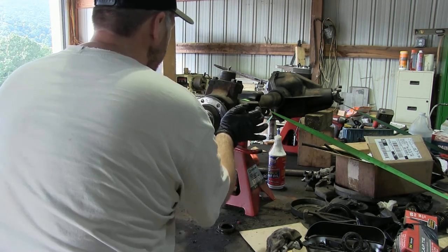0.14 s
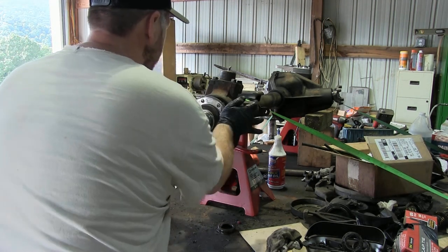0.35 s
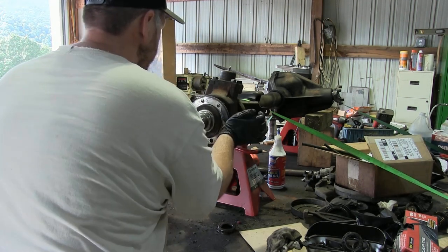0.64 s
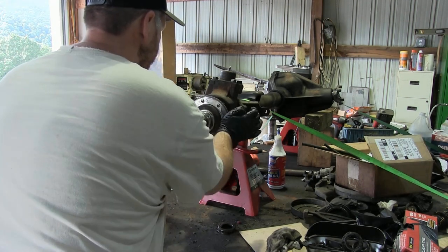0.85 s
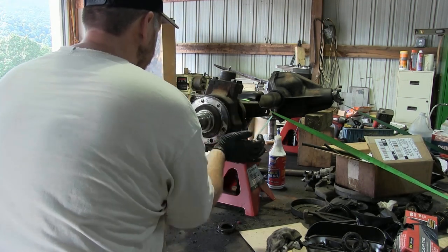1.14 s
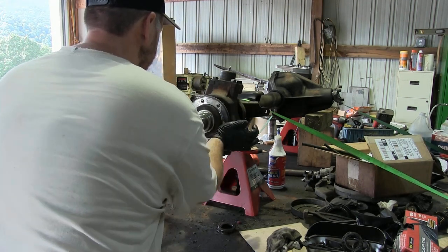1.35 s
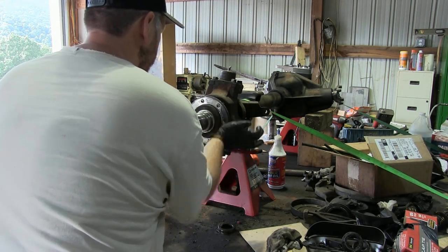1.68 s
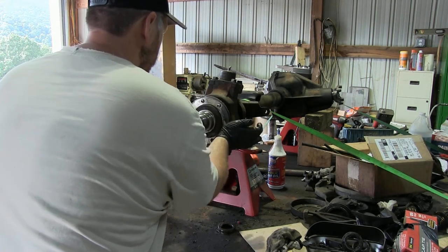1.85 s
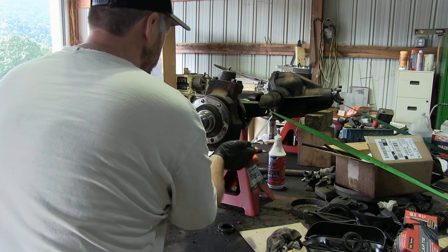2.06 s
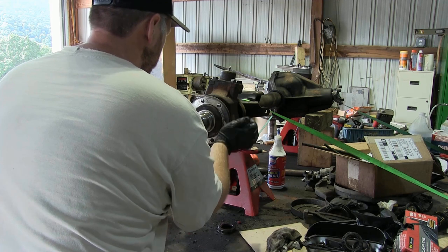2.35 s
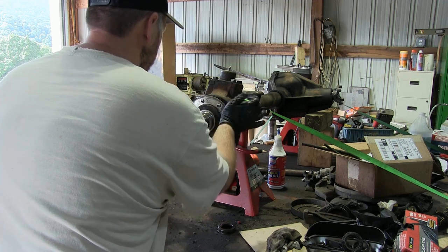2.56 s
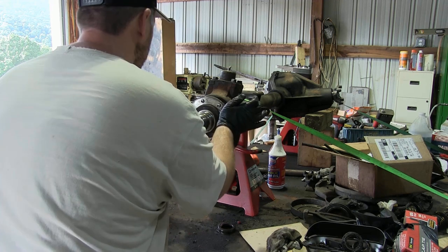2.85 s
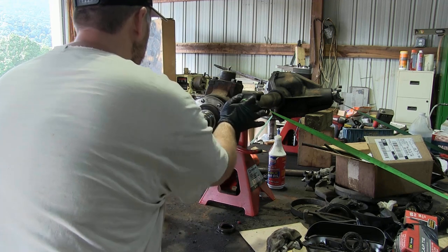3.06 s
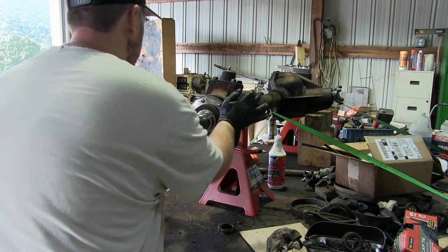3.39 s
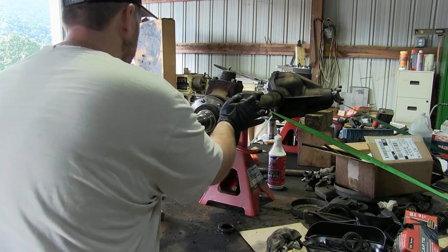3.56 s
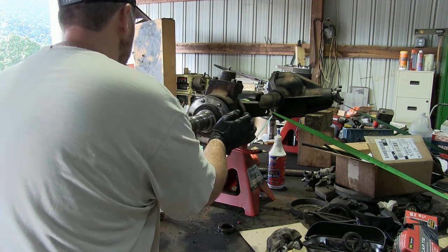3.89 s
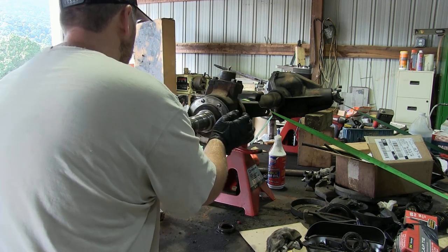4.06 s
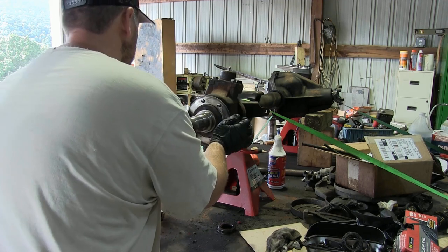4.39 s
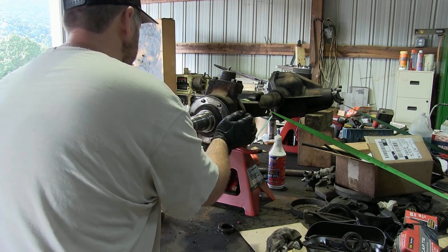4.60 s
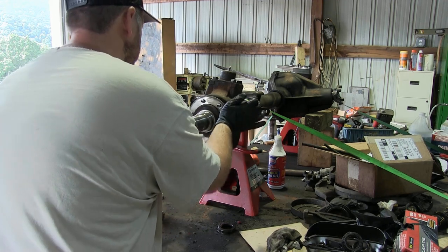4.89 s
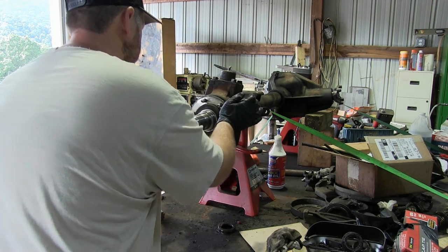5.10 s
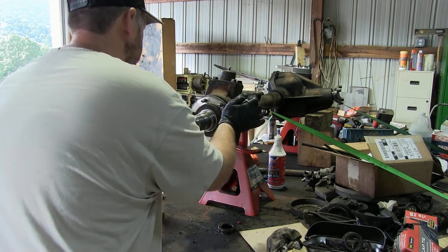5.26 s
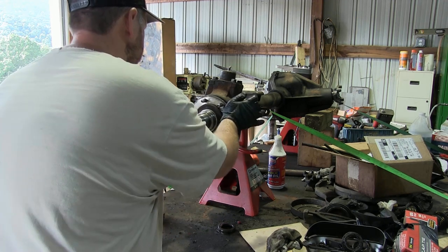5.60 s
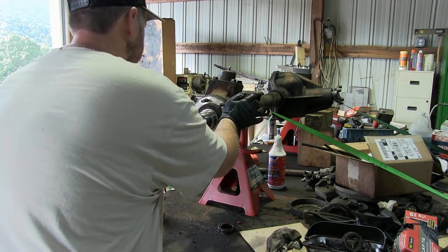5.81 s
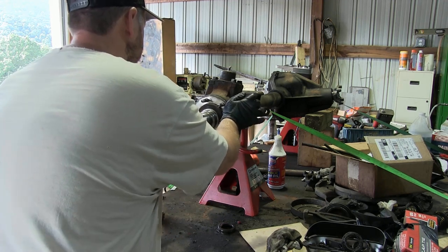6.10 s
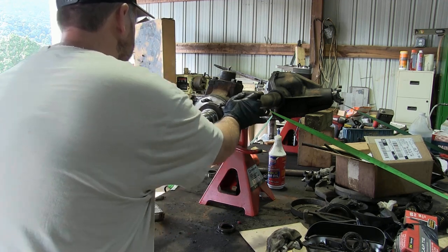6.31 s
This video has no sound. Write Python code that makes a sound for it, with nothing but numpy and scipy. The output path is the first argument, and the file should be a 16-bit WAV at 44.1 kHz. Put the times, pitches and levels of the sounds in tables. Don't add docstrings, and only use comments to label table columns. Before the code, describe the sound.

Uneven bursts of hard metal-on-metal clunks, with bounces, bright ticks and low floor thumps, over quiet insect hiss, distant rumble and faint electrical hum.

```python
import sys
import numpy as np
from scipy import signal
from scipy.fft import rfft, irfft
from scipy.io import wavfile
from scipy.ndimage import uniform_filter1d

SR = 44100
rng = np.random.default_rng(int(sys.argv[2]) if len(sys.argv) > 2 else 0)


def persist_wave(psi):
    counts = np.round(np.clip(psi, -1, 1) * 32767).astype(np.int16)
    wavfile.write(sys.argv[1], SR, np.atleast_2d(counts).T)


def invert_db(x):
    u = np.asarray(x, float) / 20
    return 10 ** u


N = 284004


def at_hz(points, hz):
    table_hz, value = np.array(points).T
    return np.interp(np.log(hz), np.log(table_hz), value)


def drift(rate_hz, size=N):
    r = np.exp(-80 * np.pi * rate_hz / SR)
    white = rng.standard_normal(size // 40 + 2002)
    slow = signal.lfilter([1], [1, -2 * r, r * r], white)[2000:]
    return np.interp(np.arange(size) / 40, np.arange(len(slow)), slow / slow.std())


def band(x, low_hz, high_hz):
    edges_hz = [low_hz, min(high_hz, .45 * SR)]
    return signal.sosfilt(signal.butter(2, edges_hz, "band", fs=SR, output="sos"), x)


def noise_bank(size, likeness, gain):
    out = 0
    edges = 28 * 2 ** np.arange(0, 9.4, 1 / 3)
    white = rng.standard_normal((2, 2, size + 4000))
    for k, (low, high) in enumerate(zip(edges, edges[1:])):
        third_octave = signal.butter(2, [low, high], "band", fs=SR, output="sos")
        mid, side = signal.sosfilt(third_octave, white[k % 2])[:, 4000:]
        hz = np.sqrt(low * high)
        alike = np.clip(at_hz(likeness, hz), -1, 1)
        stereo = np.sqrt(1 + alike) * mid + np.sqrt(1 - alike) * side * [[1], [-1]]
        out = out + gain(hz) * stereo
    return out


def ring(clicks, hz, t60):
    r, w = invert_db(-60 / (t60 * SR)), 2 * np.pi * hz / SR
    return signal.lfilter([0, np.sin(w)], [1, -2 * r * np.cos(w), r * r], clicks + 1e-18)


def swell(x, hz, rise_s):
    r = np.exp(-1 / (rise_s * SR))
    numerator = (1 - r * r) / 2 * np.array([1, 0, -1])
    return signal.lfilter(numerator, [1, -2 * r * np.cos(2 * np.pi * hz / SR), r * r], x)


# (frequency [Hz], rms level [dB])
HUM_HARMONICS = [(120, -63.5), (240, -63.5), (360, -63), (480, -56)]


def hum():
    t = np.arange(N) / SR
    out = np.zeros(N)
    for hz, db in HUM_HARMONICS:
        level = np.sqrt(2) * invert_db(db + 1.4 * drift(9.3))
        out += level * np.sin(2 * np.pi * hz * t + 2.08 * drift(2.76))
    return out


# (frequency [Hz], density [dB per Hz])
RUMBLE_SPECTRUM = [(18, -50), (30, -16.5), (239, -13.5), (287, -8), (355, -22.5), (415, -10.5),
                   (473, -10.5), (649, -15.5)]
# (frequency [Hz], density [dB per Hz])
INSECT_SPECTRUM = [(1000, -7), (1900, -11), (2850, 0), (6200, -1.5), (8300, -18), (9500, -13),
                   (10800, -23.5), (16000, -29)]
# (frequency [Hz], left-right likeness [-1 to 1])
OUTSIDE_LIKENESS = [(60, 1), (240, 0.083), (950, 0.27), (3770, 0.48), (15000, 0.49)]
# (frequency [Hz], left over right [dB])
OUTSIDE_BALANCE = [(60, 1), (240, 4), (950, 0), (3770, 2), (15000, 0.5)]
# (time [s], level [dB])
OUTSIDE_SWELL = [(0, -39.5), (1, -40), (1.8, -39), (2.3, -41.5), (3, -40), (3.999, -40.5), (4.999, -39),
                 (5.5, -38), (6.44, -38)]


def outside(insects_db=-10, patchy_db=1.3):
    together = drift(0.82)
    spectrum = RUMBLE_SPECTRUM + [(hz, db + insects_db) for hz, db in INSECT_SPECTRUM]

    def gain(hz):
        balance = invert_db(at_hz(OUTSIDE_BALANCE, hz) / 2 * np.array([[1], [-1]]))
        patches = .5 * together + drift(9.8)
        return balance * invert_db(at_hz(spectrum, hz) + patchy_db * patches)

    air = noise_bank(N, OUTSIDE_LIKENESS, gain)
    s, level_db = np.transpose(OUTSIDE_SWELL)
    return invert_db(np.interp(np.arange(N) / SR, s, level_db)) * air / air.std()


# (frequency [Hz], t60 [s])
SHED_T60 = [(60, 0.94), (200, 0.81), (600, 0.75), (1500, 0.56), (4000, 0.55), (10000, 0.27)]
# (frequency [Hz], left-right likeness [-1 to 1])
SHED_LIKENESS = [(60, 1), (240, 0.96), (950, 0.74), (3770, 0.67), (15000, 0.77)]


def shed(dry, even_over_hz=24):
    t = np.arange(SR) / SR

    def gain(hz):
        t60 = at_hz(SHED_T60, hz)
        return invert_db(-60 * t / t60) / np.sqrt(t60)

    both = rfft(noise_bank(SR, SHED_LIKENESS, gain), 2 * SR)
    power = np.abs(both.sum(axis=0)) ** 2
    colour = uniform_filter1d(power, size=2 * even_over_hz) + 1e-4 * power.mean()
    echo = irfft(both / np.sqrt(colour))[:, :SR]
    echo = echo * (1 - np.exp(-t / 0.00064)) / np.sqrt(np.sum(echo ** 2) / 2)
    return signal.fftconvolve(dry[None], echo, axes=1)[:, :N]


# (time [s], level [dB])
THUMPS = [(0.066, -52), (0.458, -38), (0.93, -49.5), (1.046, -55), (1.358, -35), (1.447, -47), (1.819, -31),
          (2.718, -51.5), (3.1, -51), (3.513, -36), (3.619, -52), (4.167, -39), (4.27, -55), (4.519, -41),
          (5.069, -37.5), (5.52, -45), (5.789, -42.5), (6.057, -37.5), (6.2, -45)]


def slab(hz=75.7, t60=0.48):
    clicks = np.zeros(N)
    s, db = np.transpose(THUMPS)
    clicks[[round((time - .01) * SR) for time in s]] = invert_db(db + 7.0)
    return swell(ring(clicks, hz, t60), hz, 0.016)


# (time [s], level [dB], lowest frequency [Hz], highest frequency [Hz])
TICKS = [(0.987, -33, 1000, 3500), (1.019, -28.5, 1000, 3500), (0.439, -24, 700, 3500),
         (0.454, -22, 3000, 11200), (1.342, -15, 795, 5860), (1.3530, 0, 1300, 3800),
         (1.810, -22, 600, 5960), (1.8581, -3.5, 1610, 4470), (2.697, -32, 4000, 15000),
         (3.072, -27, 1000, 6000), (3.501, -25.5, 1500, 15000), (4.144, -31, 790, 2480),
         (4.489, -29, 890, 2200), (5.037, -31, 596, 4000), (5.086, -22, 3500, 5227),
         (5.087, -26, 6300, 7400), (5.1, -7, 1300, 3830), (5.879, -44, 15000, 15800),
         (5.906, -40, 11000, 15800), (5.918, -45, 11000, 15800)]


def ticks():
    out, t = np.zeros(N), np.arange(400) / SR
    for s, db, low_hz, high_hz in TICKS:
        grit = rng.standard_normal(len(t)) * np.exp(-t / 0.00078)
        pulse = band(band(grit, low_hz, high_hz), low_hz, high_hz)
        out[round(s * SR):][:len(t)] += invert_db(db) * pulse / np.abs(pulse).max()
    return out


# (time [s], level [dB])
COLLAR_HITS = [
    (1.86, -34),
    (1.874, -21),
    (1.92, -27),
]
# (frequency [Hz], level [dB], t60 [s])
COLLAR_MODES = [(4010, -6, 0.16), (4020, -5, 0.098), (4230, -10, 0.095)]


def collar():
    s, db = np.transpose(COLLAR_HITS)
    clicks = np.zeros(N)
    clicks[np.round(s * SR).astype(int)] = invert_db(db)
    out = np.zeros(N)
    for hz, mode_db, t60 in COLLAR_MODES:
        out += invert_db(mode_db) * swell(ring(clicks, hz, t60), hz, 0.0015)
    return out


# (time [s], level [dB],
# share of the second family [dB], of the overtones [dB], of the top family [dB])
PINGS = [(0.453, -30.5, 12.5, -14, -32), (0.458, -16.5, -25, -28, -40), (1.354, -13.5, -11, -19, -37),
         (1.3867, -41, -5, 0, -12), (1.821, -11.5, -10, -16, -29.5), (1.8302, -24.5, -6, -4, -19),
         (1.8719, -27, -21, 2, -16), (3.0856, -26, -12, -15, -22), (3.5133, -31.5, -7, -9, -34),
         (4.156, -23, -12, -14, -27), (4.505, -23.5, -11, -19, -28), (5.055, -16, -27, -15.5, -33),
         (5.086, -27, 1, -4, -25), (5.1011, -16, -29, -12, -41), (5.1202, -27, -15, -6, -30),
         (5.154, -26, -22, -8, -26), (5.508, -34, -15, -18, -32), (5.7684, -27, -26, -11, -23),
         (5.7979, -20.5, -24, -21, -30), (5.824, -37, -20, -2, -16), (5.9044, -40, 0, -6, -17)]
# (frequency [Hz], level [dB], t60 [s])
SHAFT_FAMILIES = [
    [(3768, -1.5, 0.066), (3835, 3, 0.063), (3800, -25, 0.14), (3885, -22, 0.097), (3960, -15, 0.19)],
    [(4570, 7, 0.032), (4660, 1, 0.014)],
    [(7620, -16, 0.1), (7750, -8.5, 0.25), (7820, -6, 0.12), (7700, -16, 0.092)],
    [(9950, -0.5, 0.18), (10400, 2, 0.25), (10200, -2, 0.1), (12400, -7, .06)],
]


def shaft():
    s, db, second_db, overtone_db, top_db = np.transpose(PINGS)
    families_db = [db, db + second_db, db + overtone_db, db + top_db]
    at = np.round((s - .001) * SR).astype(int)
    luck = rng.standard_normal((len(s), 4, 8))
    out = np.zeros(N)
    for family, modes in enumerate(SHAFT_FAMILIES):
        for k, (hz, mode_db, t60) in enumerate(modes):
            clicks = np.zeros(N)
            clicks[at] = invert_db(families_db[family] + mode_db + 1.8 * luck[:, family, k])
            out += swell(ring(clicks, hz, t60), hz, 0.0011)
    return out


def strength_db(shove, hz):
    weight_hz, strength_hz, hardness_hz = 150, 550, 1500
    roll_off_db_per_octave = -10.5
    s, db, weight_db, hardness_db = np.transpose(shove)
    low = np.interp(np.log(hz), np.log([weight_hz, strength_hz]), [1, 0])
    high = np.interp(np.log(hz), np.log([strength_hz, hardness_hz]), [0, 1])
    octaves_above = max(np.log2(hz / hardness_hz), 0)
    return db + low * weight_db + high * hardness_db + roll_off_db_per_octave * octaves_above


# (frequency [Hz], level [dB])
CRACK = [(100, -20.5), (300, -7.5), (1000, -4), (3000, 1), (6000, 4.5), (13000, -3)]


def steel(shove, housing, ring_share=0.27, housing_db=-4.0, rattle_db=5.5):
    start = round(shove[0][0] * SR) - 200
    size = min(round((shove[-1][0] + .6) * SR), N) - start
    at = [round((row[0] - .002) * SR) - start for row in shove]
    luck = rng.standard_normal((len(at), 40))
    out = np.zeros(size)
    for k, (hz, db, t60) in enumerate(housing):
        mode_t60 = np.clip(t60, .03, 1.6) * ring_share
        sign = np.sign(luck[:, -1 - k // 4])
        clicks = np.zeros(size)
        clicks[at] = invert_db(strength_db(shove, hz) + db + housing_db + 1.14 * luck[:, k]) * sign
        rattle = invert_db(rattle_db * np.tanh(drift(23.0, size=size)))
        out += rattle * swell(ring(clicks, hz, mode_t60), hz, 0.0011 + 0.51 / hz)
    grit = rng.standard_normal((2, size))
    for k, hz in enumerate(np.geomspace(140, 12800, 14)):
        clicks = np.zeros(size)
        clicks[at] = invert_db(strength_db(shove, hz) + at_hz(CRACK, hz))
        fade = invert_db(-60 / ((0.038 + 50 / hz) * SR))
        load = np.exp(-1 / (0.00053 * SR))
        poles = np.convolve([1, -fade], [1, -load])
        envelope = signal.lfilter([1 - load], poles, clicks + 1e-18)
        out += band(grit[k % 2] * envelope, hz / 1.19, hz * 1.19) * np.sqrt(SR / hz)
    return np.pad(out, (start, N - start - size))


# (time [s], strength [dB],
# weight = extra drive of the lowest modes [dB], hardness = extra drive of the upper modes [dB])
SHOVE_1 = [
    (0.046, -29.5, -1.5, -10),
    (0.451, -7, -8.5, -9.5),
    (0.456, -7, -5.5, -8),
    (0.476, -12, -16, -8),
    (0.497, -15.5, -14, -3),
    (0.641, -26, -25, -13),
    (0.915, -17, -25, -27),
    (0.949, -22.5, -21, -22),
    (0.988, -46, -4, 11),
    (1.019, -41, -15, 2.5),
]
SHOVE_2 = [
    (1.349, -19.5, -4, 2),
    (1.354, -9.5, -4, -4.5),
    (1.36, -25.5, -5, 7),
    (1.389, -24, -4, 7.5),
]
SHOVE_3 = [
    (1.817, -10, 1.5, -8.5),
    (1.8225, -13, -8, 6.5),
    (1.8254, -13, -10, -1.5),
    (1.832, -17, -17, -24),
    (1.859, -11.5, -15, 3.5),
    (1.874, -13.5, -16, -9),
    (1.895, -20, -17, 0),
]
NUDGE = [
    (2.699, -26, -4.5, -10.5),
    (2.714, -41, 1, -3),
    (2.746, -39, 0, -10),
    (2.802, -42, -17, 9.5),
    (2.855, -43, -16, 1),
]
SHOVE_4 = [
    (3.079, -27.5, 11, -8),
    (3.088, -16, -17, -2),
    (3.105, -20.5, -33, -5.5),
    (3.129, -31, -6, 3),
    (3.187, -23.5, -30, -8),
]
SHOVE_5 = [
    (3.511, -8, -13.5, -19.5),
    (3.524, -18, -22, -10),
    (3.538, -17.5, -16, -8),
    (3.553, -22.5, -20, -8),
    (3.583, -30, -20, 1),
    (3.613, -30.5, -20, 1),
    (3.638, -31, -6, -12),
]
PUSH_1 = [
    (4.157, -15, -6.5, -9.5),
    (4.209, -23, -6, -11),
    (4.278, -25.5, -18, -27),
]
PUSH_2 = [
    (4.498, -28, 5, 1),
    (4.506, -13, -5.5, -8.5),
    (4.543, -12.5, -9, -18),
    (4.63, -22.5, -24, -34),
    (4.719, -38, -7, -16),
]
LONG_SHOVE_1 = [(5.051, -23, -11, 5), (5.056, -10.5, -8, 0), (5.066, -13.5, -4.5, -14),
                (5.078, -19, -9, -16), (5.088, -15.5, -9, -5), (5.102, -11.5, -19, 1),
                (5.107, -14.5, -14, -4), (5.122, -16, -6, -6.5), (5.142, -22.5, -5, -2),
                (5.19, -24, -5, -5), (5.24, -32, -7, -22), (5.287, -27.5, -7.5, -22)]
LONG_SHOVE_2 = [(5.502, -28.5, 5, -4), (5.512, -11.5, -20, -19), (5.544, -20.5, 4, -19),
                (5.631, -21, -5, -9), (5.701, -34, 2, -13), (5.758, -24, -14, -10),
                (5.769, -12, -16.5, -15), (5.797, -12.5, -17, -12.5), (5.849, -18, -21, -27),
                (5.89, -23.5, -9, -8.5), (5.933, -24, -3, -34), (6.032, -22.5, -10, -4),
                (6.036, -14.5, -4, -23), (6.074, -26.5, -20, -13), (6.144, -27.5, -4, -30),
                (6.247, -50, 26, -4)]
# (frequency [Hz], level [dB], t60 [s])
HOUSING_1 = [(165, -12, 0.4), (205.5, 4, 0.61), (253, -3.5, 0.11), (320, -11, 0.56), (408, -14, 0.62),
             (475, -6, 0.41), (502, 1, 0.23), (588, -14, .44), (1000, -9, 0.68), (1070, -4, 0.68),
             (1154, 2.5, 0.19), (1327, -5, 0.29), (1510, -14, .5), (2054, -10, .25)]
HOUSING_2 = [(221, 4, 0.6), (262, 0, 0.37), (312, 2, 0.46), (409, 0, 0.55), (472, -3, 0.35), (624, -2, 1.1),
             (870, -13, .5), (1120, -3, .4), (1190, -3, 0.84), (1255, -2, 0.67), (1730, -15, 0.37),
             (1930, -5, 0.25), (2200, -5, 0.26), (3060, -13, .29)]
HOUSING_3 = [(219, 5, 0.27), (381, -3, 0.84), (469, -4, 0.48), (504, -6, 0.76), (567, -7, 0.37),
             (669, -4.5, 0.43), (795, -18, .6), (1024, -10, 0.45), (1117, 1.5, 0.26), (1258, 4.5, 0.25),
             (1336, -1, .3), (1750, -8, .3), (2136, 0, 0.18), (2480, -16, 0.36), (3035, -10, 0.35),
             (3433, -7, 0.36)]
HOUSING_NUDGED = [(213.3, 6, .8), (249.3, 5.5, 0.96), (428, -6, .4), (496, -3, .8), (694, 0, .3),
                  (840, -18, 0.36), (1140, -8, .3), (1300, -12, 0.33)]
HOUSING_4 = [(161, -2, 0.37), (208, 1.5, 0.41), (276, 3, 0.59), (520, -3, .68), (590, -5, 0.43),
             (645, -1, 0.32), (703.5, -1.5, 0.35), (825, -4, 0.37), (995, -3, .43), (1150, -7, 0.57),
             (1290, 4, 0.13), (1580, -9, 0.45), (1830, -8, .3), (2100, 3, 0.22)]
HOUSING_5 = [(81.6, -18, 0.35), (260, -28, 0.39), (367, -0.5, 0.48), (493, -8.5, 0.31), (540, -17, 0.23),
             (650, -29, 0.37), (790, -33, 0.82), (874, -4, 0.3), (1254, -35, 0.46), (1373, -33, 0.48),
             (1561, -37, 0.48), (2110, -42, 0.6)]
HOUSING_PUSHED_1 = [(140, -4, .6), (219, 2, 0.63), (250, 0.5, 0.52), (344, -3, .5), (399.2, 0, 0.55),
                    (520, -7, .4), (618, -5, 0.49), (700, 2, 0.39), (730, -6, .4), (1018, -10, .3),
                    (1200, -10, .3), (1390, -1, 0.32), (1680, -6, .2), (2050, -5, .2)]
HOUSING_PUSHED_2 = [(78, -20, 0.62), (222, -3.5, 0.99), (394.8, 6.5, 0.41), (678, -0.5, 0.39),
                    (499, -2, 0.5), (1060, -18, 1.0), (1214, -5.5, 0.35), (1530, -17, 0.51),
                    (1600, -21.5, 0.36), (2010, -24, 0.19), (2826, -32, .5)]
HOUSING_LONG_1 = [(219.7, 2, 1.1), (391, 5.5, 0.44), (338, 0.5, 0.64), (399, 10.5, 0.74), (487, -5, 0.63),
                  (546, -3, 0.54), (567, -5, 0.65), (650, -15, .6), (830, -2.5, 0.41), (929, -3, 0.43),
                  (1117, 4.5, 0.21), (1202, -3, 0.47), (1480, -14, .3), (1760, -12, .3), (2028, 4, 0.24),
                  (3004, 4, 0.32)]
HOUSING_LONG_2 = [(135, -9.5, .7), (223, -4, 0.94), (295, -1, 0.43), (380, -1, 0.42), (396, 6, 0.43),
                  (522, -3.5, 0.64), (575, -16, 0.64), (664, -10, 0.65), (700, -10, .5), (830, -13, 0.61),
                  (1010, -18, 0.29), (1126, -1, 0.17), (1380, 5, 0.15), (1445, -4, 0.24)]


def knocks():
    depths = [(SHOVE_1, HOUSING_1), (SHOVE_2, HOUSING_2), (SHOVE_3, HOUSING_3), (NUDGE, HOUSING_NUDGED),
              (SHOVE_4, HOUSING_4), (SHOVE_5, HOUSING_5), (PUSH_1, HOUSING_PUSHED_1),
              (PUSH_2, HOUSING_PUSHED_2), (LONG_SHOVE_1, HOUSING_LONG_1), (LONG_SHOVE_2, HOUSING_LONG_2)]
    return sum(steel(shove, housing) for shove, housing in depths)


def scene():
    blows, pings, snaps = knocks(), shaft() + collar(), ticks()
    near = invert_db(-5.5) * blows + invert_db(-2.5) * pings + snaps + slab()
    far = shed(invert_db(-7.0) * blows + invert_db(-8.5) * pings + invert_db(-8.0) * snaps)
    lean = invert_db(np.array([[.2], [-.2]]))
    return near * lean + far + outside() + hum()


def band_limit(x):
    return signal.sosfilt(signal.butter(12, 16320, fs=SR, output="sos"), x)


def record(dry):
    top, cutoff_hz = 1.5, 15700
    x = signal.sosfilt(signal.butter(2, 52, "high", fs=SR, output="sos"), dry)
    rounded = top * np.tanh(x / top)
    mix = signal.sosfilt(signal.ellip(12, .5, 60, cutoff_hz, fs=SR, output="sos"), rounded)
    return band_limit(mix)


dry = scene()
out = record(dry)
persist_wave(out)
```